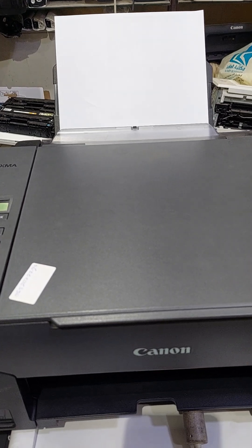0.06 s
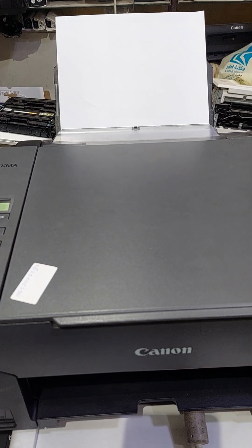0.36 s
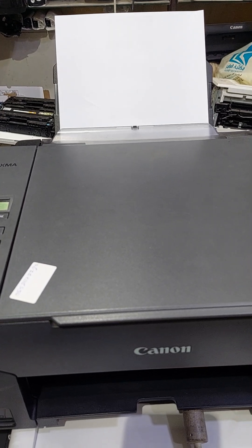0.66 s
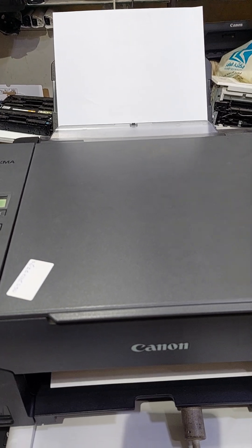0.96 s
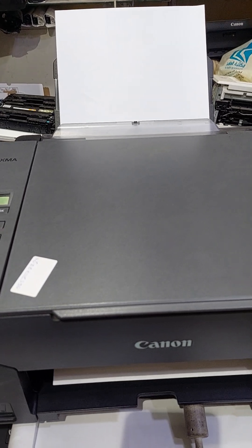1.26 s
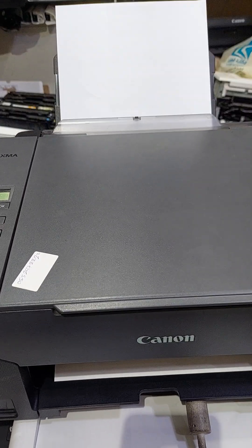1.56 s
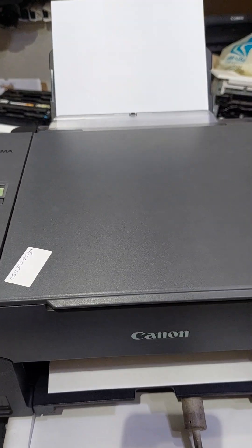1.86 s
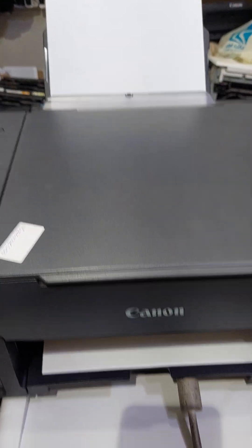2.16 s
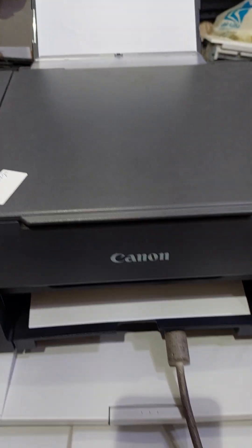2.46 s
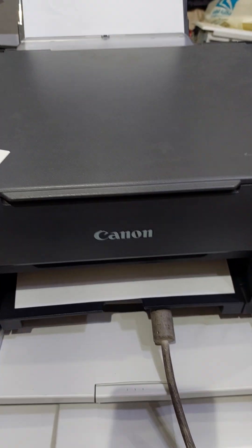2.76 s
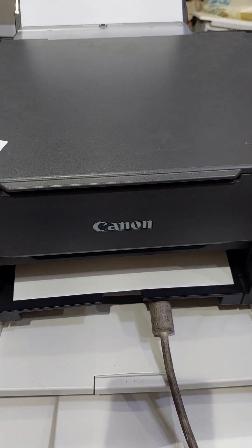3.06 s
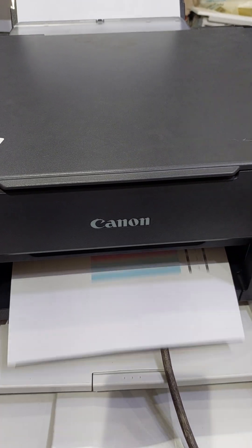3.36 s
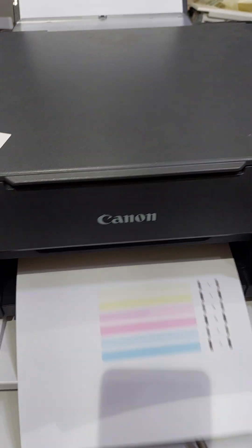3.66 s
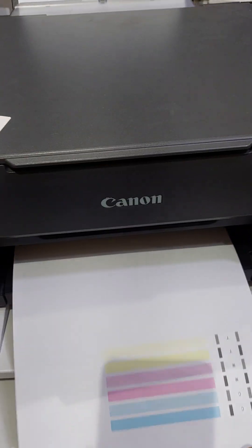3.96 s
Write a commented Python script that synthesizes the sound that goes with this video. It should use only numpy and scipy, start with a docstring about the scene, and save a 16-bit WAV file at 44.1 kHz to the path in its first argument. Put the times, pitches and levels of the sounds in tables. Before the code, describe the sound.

Close by in a room, an inkjet printer feeds paper in three short, whining, rattling bursts with faint ticks between. It then ejects the sheet in a longer whir with a papery swish, over a low background hum and throb.

```python
"""Room noise, a wavering hum and a low throb, probably an engine outside, run from start to end.
Close by, an inkjet printer steps a sheet forward three times: its motor drives two gear meshes that
knock, whine and rattle in the plastic case as the print head turns round. Faint ticks fall in between.
At 3.2 s it runs the sheet out in one long whir. The paper swishes, rubs and squeaks, its tail flicks
off the rollers, and they sing on thinly until the motor starts to slow."""
import sys
import numpy as np
from scipy import signal
from scipy.fft import rfft, irfft
from scipy.io import wavfile

SR = 44100
rng = np.random.default_rng(int(sys.argv[2]) if len(sys.argv) > 2 else 0)


def bounce(signal):
    """Save signal as a 16-bit WAV file at the path given by the first command-line argument."""
    frames = np.transpose(np.atleast_2d(signal))
    limited = np.clip(frames, -1, 1)
    pcm = np.round(limited * 32767).astype(np.int16)
    wavfile.write(sys.argv[1], SR, pcm)


N = 176400
T, FREQS = np.arange(N) / SR, np.maximum(np.fft.rfftfreq(N, 1 / SR), 1)
EJECT_S, EJECT_SPIN_UP_S, FLICK_S = 3.186, .034, 3.666
DRIVE_PEAK_S, BRAKE_PEAK_S = .030, .045  # after the start of a step
CASE_PAN_DB, PAPER_PAN_DB = -1.5, -3  # left over right

# feed steps: t/s, top speed/eject speed, level/dB
STEPS = [(0.014, .965, -6), (0.886, 1.236, -2.5), (1.803, 1.236, -2)]
# load on the gears in the eject: t/s, idler mesh level/dB, pinion mesh level/dB
GEAR_LOAD = [(3.2, -2, -1.5), (3.4, -0.5, 1), (3.55, 0, 0), (3.64, -0.5, -0.5), (3.7, 1.5, 0.5),
             (3.81, 2.5, 2), (3.9, 2.5, 1), (3.94, -2.5, -4.5), (4.0, -4.5, -6)]
# stereo image of the printer: f/Hz, left-right correlation
CASE_IMAGE = [(200, 1), (700, 0.8), (1500, 0.97), (2400, 0.41), (4000, -0.036), (12000, -0.026)]
# EQ of the ticks and the carriage: f/Hz, level/dB
PLASTIC_EQ = [(600, -13), (2500, 5), (6000, -7.5), (12000, -14), (16000, -16)]


def undb(db):
    """Decibels to gain."""
    return 10 ** (np.asarray(db) / 20)


def unit(x):
    """Scale to rms 1."""
    return x / np.sqrt(np.mean(x ** 2))


def curve(rows, column=1):
    """Automation lane: one column of a time table, at every sample."""
    rows = np.array(rows)
    return np.interp(T, rows[:, 0], rows[:, column])


def across(points, hz=FREQS):
    """Read (f/Hz, value) points on a log-frequency axis."""
    points = np.array(points)
    return np.interp(np.log(hz), np.log(points[:, 0]), points[:, 1])


def resonances(modes):
    """Gain per frequency of steep resonances: f/Hz, width/Hz, level/dB."""
    return sum(undb(db) / (1 + ((FREQS / hz - hz / FREQS) * hz / width) ** 2) for hz, width, db in modes)


def drift(rate_hz):
    """Random modulator: low-passed noise at rms 1."""
    return unit(irfft(rfft(rng.standard_normal(N)) / (1 + (FREQS / rate_hz) ** 4), N))


def pan(db):
    """Channel gains with the left db above the right."""
    return undb(np.array([[db], [-db]]) / 2)


def noise(eq, image=CASE_IMAGE, gate=1):
    """Stereo noise at rms 1, gated ahead of its EQ."""
    correlation = np.clip(across(image), -.99, .99)
    spectra = rfft(rng.standard_normal((2, N)) * gate) * eq
    mid, side = spectra * np.sqrt([1 + correlation, 1 - correlation])
    return unit(irfft(np.array([mid + side, mid - side]), N))


def hit(start_s, decay_s):
    """Envelope with a hard attack and an exponential tail."""
    return (T >= start_s) * np.exp(-np.maximum(T - start_s, 0) / decay_s)


def ramp(start_s, length_s):
    """Smooth fade from 0 to 1."""
    return np.sin(np.pi / 2 * np.clip((T - start_s) / length_s, 0, 1))


def feed_steps(peak_s, spin_up_s=.027, hold_s=.011, brake_s=.050, swell_db=9, swell_width_s=.015):
    """Speed and envelope of the steps: spin up, hold, brake, with a swell peak_s after each start."""
    speed, envelope = 0, 0
    for start, top_speed, db in STEPS:
        braked = np.clip((T - start - spin_up_s - hold_s) / brake_s, 0, 1)
        move = ramp(start, spin_up_s) * (1 - braked ** 2)
        lift_db = swell_db / (1 + ((T - start - peak_s) / swell_width_s) ** 4)
        speed = speed + top_speed * move
        envelope = envelope + undb(db + lift_db) * move ** 2
    return speed, envelope


def room(air_db=-38, low_cut_hz=46, hum_hz=241.9, hum_width_hz=4.9, hum_db=-46.5):
    """A bed of broad room noise, with a noise band so narrow that it wavers as a hum."""
    air_eq = [(65, -7), (110, -6), (188, -6), (209, -10), (242, 0), (268, -11), (343, -10.5), (414, -14),
              (450, -12.5), (542, -16.5), (786, -16), (909, -18.5), (1490, -21), (1960, -22.5),
              (3490, -37.5), (4480, -37.5), (9050, -47), (12100, -44.5), (15500, -49)]  # colour of the room noise: f/Hz, level/dB
    air_swell = [(0, 1), (.45, 1.5), (.8, 2), (1.08, 0.5), (1.3, 1), (1.75, 1), (2.15, 0), (2.5, 1.5),
                 (3.1, 2), (4, 1.5)]  # its slow rise and fall: t/s, level/dB
    room_image = [(100, 1), (300, 0.86), (700, 0.49), (1500, 0), (4000, 0.013), (12000, 0)]  # stereo image: f/Hz, left-right correlation
    eq = undb(across(air_eq)) / (1 + (low_cut_hz / FREQS) ** 4)
    air = noise(eq, room_image) * undb(air_db + curve(air_swell) + .52 * drift(11.6))
    hum = noise(resonances([(hum_hz, hum_width_hz, 0)]), room_image) * undb(hum_db)
    return air + hum


def throb(harmonics=7):
    """Dull, slightly uneven pulses, probably an engine outside, whose rate rises and falls."""
    revs = [(0, 48, -39), (.15, 46.7, -32.5), (.37, 54, -31), (.47, 53, -35), (.58, 62, -33.5),
            (.8, 63.5, -41.5), (1.22, 66.5, -47), (1.65, 65.6, -38), (1.85, 59, -36.5), (1.96, 42, -43),
            (2.04, 50, -32.5), (2.2, 50, -31.5), (2.44, 51, -30), (2.52, 53, -34), (2.72, 61, -40.5),
            (3.04, 60.5, -43), (3.45, 65, -41.5), (4, 64, -46)]  # course of the throb: t/s, pulse rate/Hz, level/dB
    throb_eq = [(40, -2), (55, 3.5), (98, 6), (145, 1.5), (200, -33), (250, -10), (400, -37)]  # weight of its harmonics: f/Hz, level/dB
    hz = curve(revs) * (1 + .005 * drift(20))
    phase = 2 * np.pi * np.cumsum(hz) / SR
    pulses = sum(undb(across(throb_eq, k * hz) + .9 * drift(15)) * np.cos(k * phase)
                 for k in range(1, harmonics + 1))
    return unit(pulses) * undb(curve(revs, column=2) + .7 * drift(25))


def ticks(decay_s=.0078):
    """Faint plastic ticks of the mechanism between the steps."""
    tick_cues = [(0.28, -46), (0.369, -49), (0.469, -45), (0.873, -46), (1.234, -45.5), (1.331, -48.5),
                 (1.791, -48), (2.277, -45)]  # ticks: t/s, level/dB
    return noise(undb(across(PLASTIC_EQ))) * sum(undb(db) * hit(s, decay_s) for s, db in tick_cues)


def carriage(level_db=-52.5, delay_s=.041, width_s=.066):
    """A soft slide swells around each step as the print head turns round."""
    turning = sum(np.exp(-((T - start - delay_s) / width_s) ** 2) for start, _, _ in STEPS)
    return noise(undb(across(PLASTIC_EQ))) * turning * undb(level_db)


def rollers(step_db=-54.5, sing_db=-54):
    """The rollers hiss as they turn and sing thinly once free of the sheet."""
    hiss_eq = [(1500, -22), (4000, 7), (6000, -1.5), (9000, -5.5), (12000, -4.5), (16000, -12)]  # colour of the hiss: f/Hz, level/dB
    hiss_fader = [(3.19, -90), (3.21, -46.5), (3.4, -46), (3.64, -46), (3.7, -47.5), (4, -52)]  # hiss in the eject: t/s, level/dB
    sing_modes = [(4190, 67, 0), (4700, 200, -3), (5840, 180, -1)]  # f/Hz, width/Hz, level/dB
    _, driving = feed_steps(DRIVE_PEAK_S)
    ejecting = undb(curve(hiss_fader)) * ramp(EJECT_S, EJECT_SPIN_UP_S)
    hiss = noise(undb(across(hiss_eq)), gate=undb(drift(200))) * (ejecting + undb(step_db) * driving)
    sing = noise(resonances(sing_modes)) * (T > FLICK_S) * undb(sing_db + curve(GEAR_LOAD))
    return hiss + sing


def sheet_slide(swish_width_hz=430, grain_db=6.6, rub_pan_db=-4.5):
    """The paper rubs harder on the rollers, and its swish falls as more of it hangs free."""
    rub_fader = [(3.19, -75), (3.22, -49), (3.42, -42), (3.5, -35.5), (3.61, -29.5), (3.662, -28),
                 (3.68, -48), (4.0, -46)]  # paper on the rollers: t/s, level/dB
    rub_modes = [(2413, 110, 1), (2060, 260, -6), (2730, 110, -7)]  # f/Hz, width/Hz, level/dB
    swish_sweep = [(3.2, 3880, -70), (3.24, 3610, -46), (3.35, 3440, -43), (3.43, 3366, -45),
                   (3.48, 3230, -39), (3.51, 3020, -43), (3.56, 2773, -39), (3.655, 2700, -41),
                   (3.69, 2570, -75)]  # sliding paper: t/s, centre f/Hz, level/dB
    rub = noise(resonances(rub_modes), gate=undb(grain_db * drift(250)))
    rub = rub * undb(curve(rub_fader)) * pan(rub_pan_db)
    phase = 2 * np.pi * np.cumsum(curve(swish_sweep)) / SR
    band = np.array([drift(swish_width_hz) * np.cos(phase) + drift(swish_width_hz) * np.sin(phase)
                     for _ in range(2)])
    swish = band * undb(curve(swish_sweep, column=2)) * pan(PAPER_PAN_DB)
    return (rub + swish) * ramp(EJECT_S, EJECT_SPIN_UP_S)


def sheet_thumps(bump_s=3.462, bump_db=-34, flick_db=-24):
    """The sheet bumps as it droops and catches, then its tail flicks off the rollers."""
    flick_modes = [(254, 42, 6), (164, 29, -6), (1100, 1450, -13), (5200, 2200, -36)]  # thump of the tail: f/Hz, width/Hz, level/dB
    bump_modes = [(287, 50, 0)]  # drooping sheet: f/Hz, width/Hz, level/dB
    flick = noise(resonances(flick_modes)) * hit(FLICK_S, decay_s=.026) * undb(flick_db)
    bump = noise(resonances(bump_modes)) * hit(bump_s, decay_s=.03) * undb(bump_db)
    return bump + flick * pan(CASE_PAN_DB)


def squeaks(sink_per_s=.3, jitter=.012, left_lead_rad=1.5):
    """Short rough tones that sink in pitch: first a gear tone near 3 kHz swells briefly as the swish passes
    through it, then the sliding sheet catches and slips."""
    squeak_cues = [(3.468, 0.037, 3040, -34), (3.48, 0.0122, 3330, -32), (3.552, .03, 2760, -31),
                   (3.635, 0.015, 2570, -35), (3.661, .016, 2210, -25)]  # a gear tone swelling near 3 kHz, then catches on the rollers: centre t/s, length/s, f/Hz, peak level/dB
    tones = 0
    for s, length, hz, db in squeak_cues:
        pitch = hz * (1 - sink_per_s * np.clip(T - s, -length, length) + jitter * drift(256))
        tone = np.sin(2 * np.pi * np.cumsum(pitch) / SR + np.array([[left_lead_rad], [0]]))
        tones = tones + tone * undb(db) * np.exp(-(2 * (T - s) / length) ** 2)
    return tones * pan(PAPER_PAN_DB)


def gear_slack(level_db=-31.5, eject_trim_db=-5, delay_s=.007, decay_s=.018):
    """A hollow knock as the teeth take up their slack at each start, gentler for the eject."""
    knock_modes = [(740, 110, 0), (2230, 900, -19)]  # f/Hz, width/Hz, level/dB
    knocks = sum(hit(start + delay_s, decay_s) for start, _, _ in STEPS)
    knocks = knocks + undb(eject_trim_db) * hit(EJECT_S + delay_s, decay_s)
    return noise(resonances(knock_modes)) * undb(level_db) * knocks


def resonant_lift_db(hz, bow_s=3.556, bow_width_s=.11, bow_hz=2440, bow_width_hz=770, bow_db=8.5):
    """Boost of a gear partial as the case, and briefly the bowed sheet, radiate it."""
    case_modes = [(847, 64, 7.5), (1431, 57, 4), (2257, 207, 4.5)]  # plastic case: f/Hz, width/Hz, level/dB
    bowing = np.exp(-((T - bow_s) / bow_width_s) ** 2)
    modes = case_modes + [(bow_hz, bow_width_hz, bow_db * bowing)]
    return sum(db / (1 + (2 * (hz - centre) / width) ** 2) for centre, width, db in modes)


def tooth_rattle(travel, mesh_hz, moving, decay_s=.0005, scatter_db=2):
    """Every tooth knocks: a tiny noise burst, each at its own level."""
    rattle_eq = [(100, -35), (250, 10), (480, -7.5), (650, 4.5), (860, 3), (1020, -4), (1400, 3),
                 (1650, -5), (2000, -1.5), (2350, 5), (2650, -9), (3300, -8.5), (4300, -15.5), (6000, -22),
                 (9000, -28.5), (12000, -28), (16000, -32)]  # colour of the knocks: f/Hz, level/dB
    teeth = travel * mesh_hz
    strength = undb(scatter_db * rng.standard_normal(N)[teeth.astype(int)])
    knocks = strength * np.exp(-(teeth % 1) / mesh_hz / decay_s)
    rattle = noise(undb(across(rattle_eq)), gate=knocks * moving)
    return rattle * np.sqrt(np.mean(moving)) * pan(CASE_PAN_DB)


def gears(shaft_hz=75, idler_mesh_hz=916.5):
    """Two meshes whine with their sum tones and rattle; the rates given hold at eject speed."""
    # gear tones: shaft multiple, idler mesh multiple, step level/dB, eject level/dB, pan/dB, left lead/rad
    partials = [(0, 1, -39.5, -34.3, -2.5, 1.45), (16, 0, -39, -39.3, -3, 1.3),
                (18, 0, -59, -39.3, 3, -0.24), (0, 2, -40.5, -49, -6, 1.6), (32, 0, -41, -38.5, -5, 1.15),
                (16, 1, -55, -46.5, -11, 0.2), (15, 0, -61, -53, 4, -0.84), (17, 0, -55, -44, -1, 2.2),
                (31, 0, -53, -47.5, -8, -1.6), (0, 3, -50, -52, -3.5, 3.6), (16, 2, -65, -52, -4, 2.5),
                (32, 1, -62, -51.5, 3, 3.6), (46, 0, -54, -62, -5, -1.4), (48, 0, -57, -55.5, 1, 4),
                (32, 2, -69, -58, 7, 1.5)]
    slow_s, slow_per_s = 3.968, 1.4  # the motor slows once the sheet is out
    treble_hz, flutter_db = 1700, 1.1
    eject_rattle_db, step_rattle_db = -34.5, -35
    run = ramp(EJECT_S, EJECT_SPIN_UP_S)
    idler_load = run ** 2 * undb(curve(GEAR_LOAD))
    pinion_load = run ** 2 * undb(curve(GEAR_LOAD, column=2))
    step_speed, driving = feed_steps(DRIVE_PEAK_S)
    _, braking = feed_steps(BRAKE_PEAK_S)
    step_speed = step_speed * (1 + .008 * drift(90))  # the motor hunts in a step
    speed = step_speed + run * (1 - slow_per_s * np.maximum(T - slow_s, 0))
    travel = np.cumsum(speed * (1 + .001 * drift(120))) / SR  # in seconds at eject speed
    chatter = 1 + .12 * drift(420)  # the teeth chatter in a step
    whine = 0
    for shaft, idler, step_db, eject_db, pan_db, lead in partials:
        hz = shaft * shaft_hz + idler * idler_mesh_hz
        step = chatter * (driving if hz > treble_hz else braking) * undb(step_db)
        eject = (pinion_load if shaft else idler_load) * undb(eject_db)
        envelope = (step + eject) * undb(resonant_lift_db(hz * speed) + flutter_db * drift(49))
        tone = np.sqrt(2) * np.sin(2 * np.pi * hz * travel + np.array([[lead], [0]]))
        whine = whine + tone * envelope * pan(pan_db)
    effort = idler_load * undb(eject_rattle_db) + np.sqrt((driving + braking) / 2) * undb(step_rattle_db)
    rattle = tooth_rattle(travel, idler_mesh_hz, speed > 0) * effort
    tremolo = 1 + .08 * np.sin(2 * np.pi * shaft_hz * travel)  # once per turn of the shaft
    return tremolo * (whine + rattle)


def scene(echo_db=-13, background_pan_db=-2.5):
    """The printer with its short echo off the walls, over the room bed and the throb."""
    printer = gears() + gear_slack() + sheet_slide() + rollers() + sheet_thumps()
    printer = printer + squeaks() + carriage() + ticks()
    walls = rng.standard_normal((2, N)) * hit(start_s=.0056, decay_s=.032)
    walls = walls / np.sqrt(np.sum(walls ** 2, axis=1, keepdims=True))
    echo = signal.fftconvolve(printer, walls, axes=1)[:, :N]
    return printer + undb(echo_db) * echo + (room() + throb()) * pan(background_pan_db)


def record(dry):
    """A steep low-pass takes off the very top."""
    return signal.sosfilt(signal.ellip(10, .2, 80, 15750, fs=SR, output="sos"), dry)


dry = scene()
out = record(dry)
bounce(out)
```